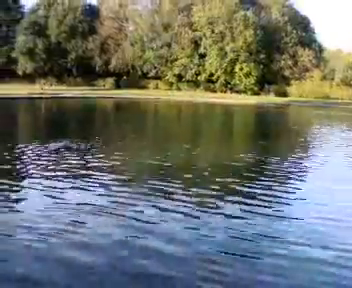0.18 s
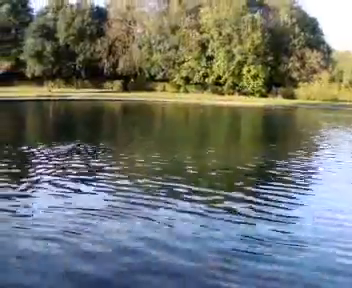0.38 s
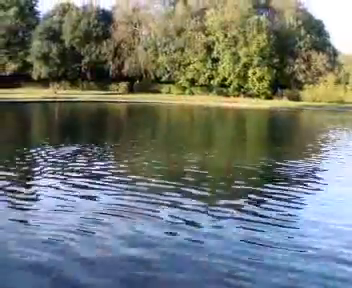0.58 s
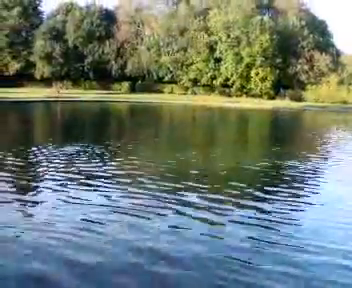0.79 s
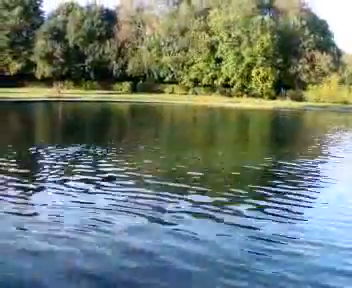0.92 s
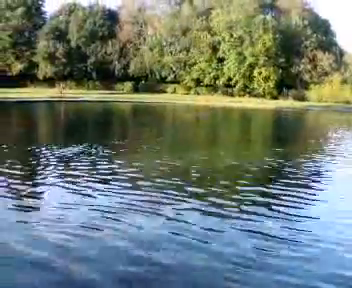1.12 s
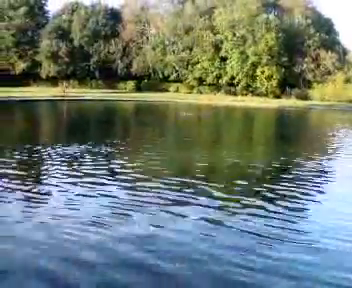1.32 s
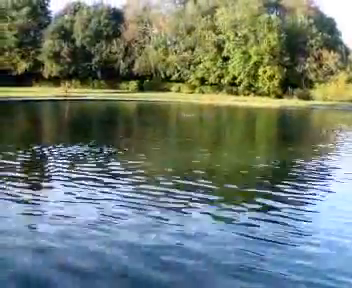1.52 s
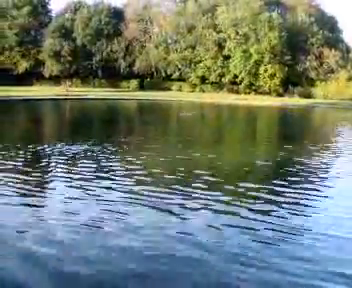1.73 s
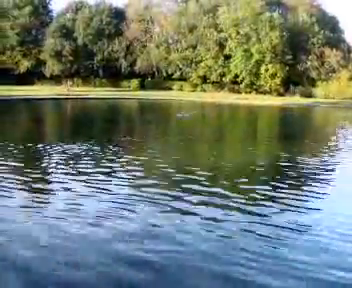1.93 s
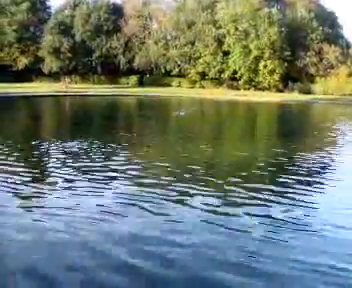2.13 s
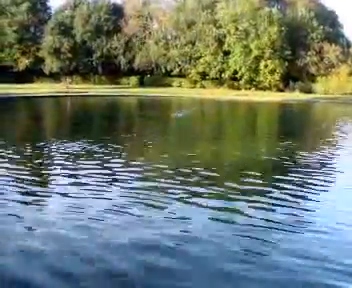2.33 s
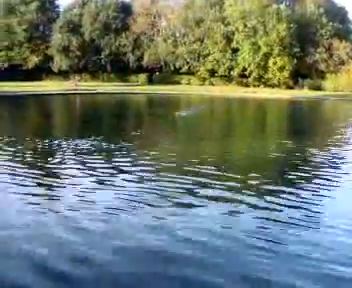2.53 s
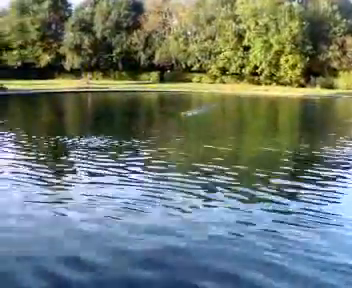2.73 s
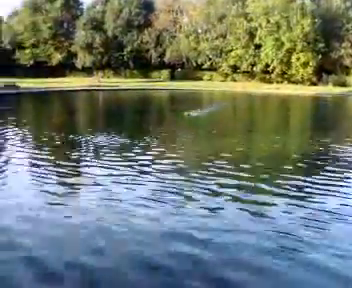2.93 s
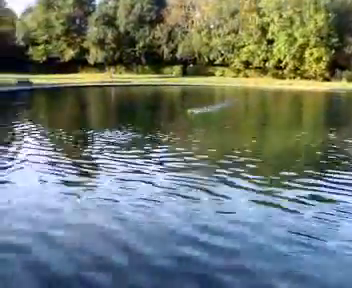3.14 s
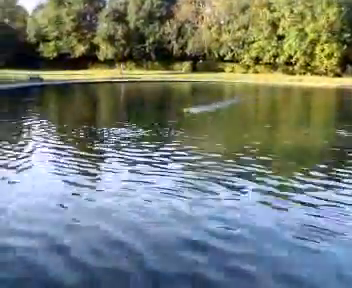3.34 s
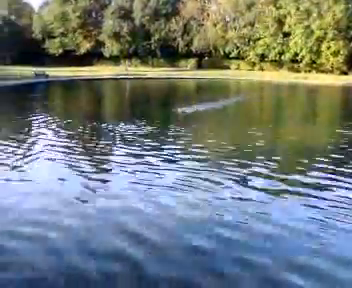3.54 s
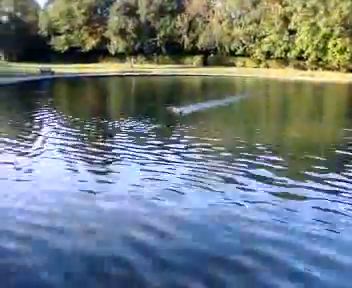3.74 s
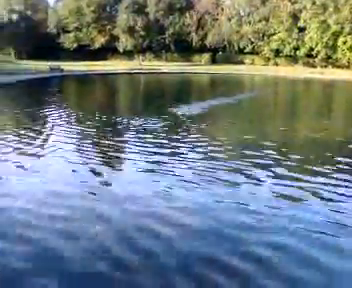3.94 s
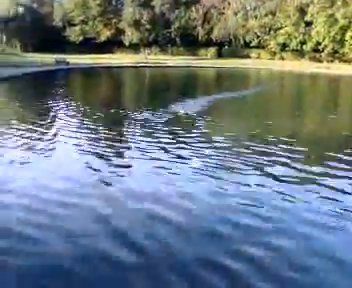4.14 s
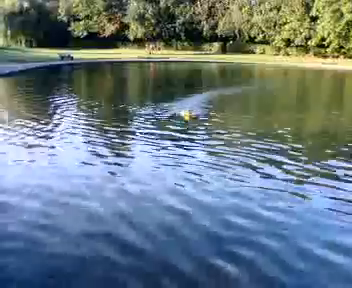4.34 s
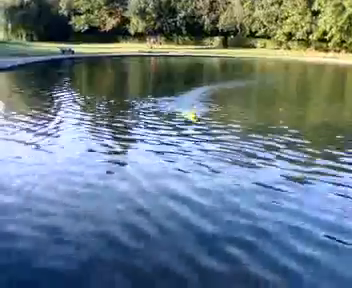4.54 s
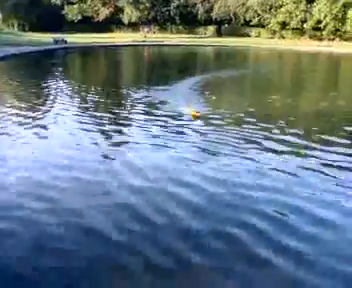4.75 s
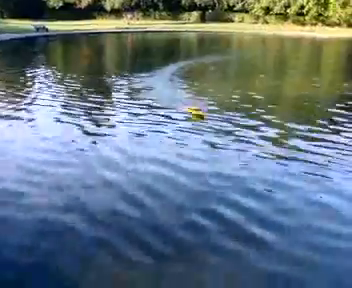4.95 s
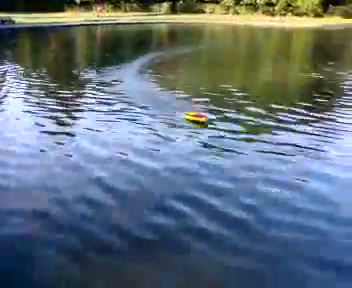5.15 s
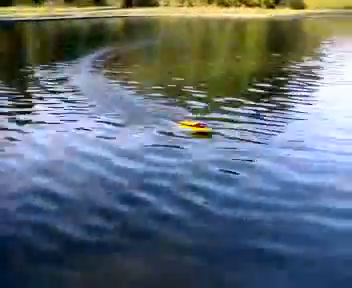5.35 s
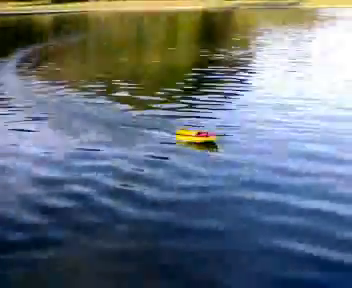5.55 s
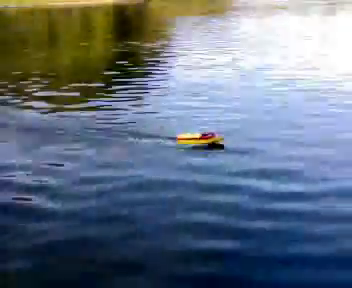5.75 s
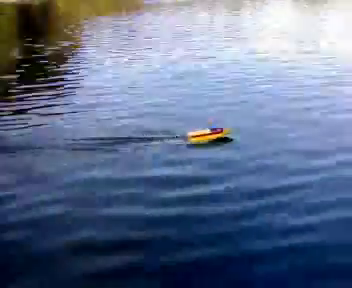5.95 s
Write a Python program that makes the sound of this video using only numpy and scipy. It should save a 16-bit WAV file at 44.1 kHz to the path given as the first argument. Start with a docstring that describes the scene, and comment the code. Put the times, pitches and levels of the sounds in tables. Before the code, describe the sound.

A small model boat engine buzzes in a steady nasal whine across a pond, rattling and hissing, growing much louder as it passes close.

```python
"""Model boat on a pond

A model boat with a small glow-plug two-stroke rounds a park pond and comes close to a listener on the bank.
One firing a turn gives a harmonic series, summed from sinusoids, whose balance changes with heading.
The fifth harmonic drums in gated bursts when the hull lifts off the ripples. Exhaust gas and spray hiss
between the harmonics as noise bands puffing once a turn, over the low noise of a distant town.
"""
import sys
import numpy as np
from scipy import signal
from scipy.io import wavfile
from scipy.ndimage import uniform_filter1d

SR = 44100
rng = np.random.default_rng(int(sys.argv[2]) if len(sys.argv) > 2 else 0)


def inscribe(sig):
    """Save sig as 16-bit PCM at rate SR to the path in sys.argv[1].

    A 1-D sig is mono; a 2-D sig holds one channel per row.
    Samples are clipped to [-1, 1] before scaling.
    """
    pcm = np.round(np.clip(np.atleast_2d(sig).T, -1, 1) * 32767)
    wavfile.write(sys.argv[1], SR, pcm.astype(np.int16))


N = 265460

# Engine speed. Each row: time in seconds, firing rate in Hz.
FIRING_RATE = [(0.0, 238.4), (0.3, 240.3), (0.45, 238.7), (0.7, 240.0), (1.3, 242.6), (1.5, 241.4),
               (1.62, 244.3), (1.85, 244.6), (2.05, 243.2), (2.25, 245.8), (2.8, 245.2), (3.0, 242.5),
               (3.2, 244.1), (3.5, 243.6), (3.65, 239.9), (3.77, 241.3), (3.93, 235.4), (4.1, 237.9),
               (4.4, 239.3), (4.9, 243.2), (5.25, 241.4), (5.72, 241.6), (5.82, 240.3), (6.02, 241.2)]
# The boat's way in. Each row: time in seconds, distance in metres.
DISTANCE = [(0, 34.6), (1, 31), (2, 27.5), (2.6, 22.1), (3.3, 19.7), (4, 13.7), (4.5, 10.9), (5, 6.8),
            (5.7, 4.66), (6.02, 5.54)]
# Side turned to the listener. Each row: time in seconds, heading as a place among the six views
# (0 far side, 1 far quarter, 2 bow quarter, 3 bow, 4 near side, 5 stern quarter; held beyond the ends).
HEADING_TRACK = [(0, -0.5), (.8, 0.2), (1.4, 0.9), (2.1, 0.9), (2.8, 2), (3.45, 2), (3.85, 3), (4.7, 3),
                 (5.4, 3.95), (5.66, 4.5), (5.87, 5), (6.02, 6)]
# Harmonic balance in the six views. Each row: multiple of the firing rate, relative level in dB.
FAR_SIDE_HARMONICS = [(1, -5.5), (2, 2.5), (3, -6.5), (4, -11), (5, 0.5), (6, -6), (7, -9.5), (8, -8),
                      (9, -17.5), (10, -20), (11, -17), (12, -12), (13, -34), (14, -17), (15, -18),
                      (16, -23), (17, -35), (18, -11.5), (19, -26), (20, -2), (21, -23), (22, -24),
                      (23, -27), (24, -45), (25, -34), (26, -47), (27, -49), (28, -37)]
FAR_QUARTER_HARMONICS = [(1, -9.5), (2, 1), (3, -7.5), (4, -10), (5, 0), (6, -10), (7, -14), (8, -18),
                         (9, -13.5), (10, -15), (11, -22), (12, -19), (13, -22.5), (14, -12), (15, -23.5),
                         (16, -16), (17, -11), (18, -19.5), (19, -21), (20, -13.5), (21, -26.5),
                         (22, -33.5), (23, -27), (24, -37.5), (25, -31.5), (26, -40), (27, -43.5),
                         (28, -45)]
BOW_QUARTER_HARMONICS = [(1, -9.5), (2, 0), (3, -6.5), (4, -9.5), (5, 0.5), (6, -18), (7, -13), (8, -28.5),
                         (9, -8), (10, -19.5), (11, -31), (12, -17.5), (13, -24.5), (14, -12), (15, -16),
                         (16, -24.5), (17, -13.5), (18, -21), (19, -10.5), (20, -14), (21, -27.5),
                         (22, -25), (23, -31), (24, -35), (25, -34.5), (26, -36.5), (27, -43), (28, -58)]
BOW_HARMONICS = [(1, -4.5), (2, 4.5), (3, -3), (4, -8), (5, -4.0), (6, -3), (7, -10.5), (8, -11.5),
                 (9, -12), (10, -15.5), (11, -15.5), (12, -32), (13, -17), (14, -23.5), (15, -13),
                 (16, -35), (17, -30), (18, -14), (19, -23.5), (20, -19), (21, -29.5), (22, -23),
                 (23, -35.5), (24, -32), (25, -44), (26, -46.5), (27, -46), (28, -44.5)]
NEAR_SIDE_HARMONICS = [(1, -8.5), (2, 1.5), (3, -11), (4, -10.5), (5, 1), (6, -13), (7, -17.5), (8, -19),
                       (9, -21.5), (10, -20.5), (11, -21), (12, -32), (13, -25.5), (14, -37.5), (15, -26),
                       (16, -26), (17, -20.5), (18, -6.5), (19, -7), (20, -3.5), (21, -23), (22, -20),
                       (23, -23.5), (24, -29), (25, -30), (26, -46.5), (27, -40.5), (28, -40)]
STERN_QUARTER_HARMONICS = [(1, -11), (2, -5.5), (3, -9.5), (4, -17), (5, 1), (6, -19.5), (7, -12),
                           (8, -25.5), (9, -20.5), (10, -21.5), (11, -27), (12, -40), (13, -22.5),
                           (14, -31.5), (15, -17.5), (16, -28), (17, -21), (18, -13), (19, -17), (20, -17),
                           (21, -24), (22, -28), (23, -31.5), (24, -37), (25, -33.5), (26, -47.5),
                           (27, -45), (28, -38.5)]
# Hull drumming on the 5th harmonic, as heard by the listener.
# Each row: start in seconds, length in seconds, level in dB.
DRUM_BURSTS = [(0.008, 0.09, -34.5), (0.162, 0.058, -33.5), (0.284, 0.087, -33), (0.411, 0.025, -38),
               (0.5, 0.022, -32), (0.618, 0.058, -31), (0.812, 0.06, -31), (0.96, 0.05, -29.5),
               (1.047, 0.036, -35), (1.105, 0.045, -35), (1.194, 0.021, -32.5), (1.29, 0.016, -31),
               (1.363, 0.041, -31.5), (1.49, 0.035, -31), (1.592, 0.036, -36), (1.76, 0.025, -31.5),
               (1.892, 0.038, -33.5), (1.956, 0.027, -27.5), (2.088, 0.064, -27.5), (2.251, 0.091, -26.5),
               (2.532, 0.071, -26), (2.669, 0.014, -32), (2.731, 0.096, -27.5), (2.944, 0.024, -27),
               (3.038, 0.079, -26.4), (3.271, 0.076, -24), (3.436, 0.016, -29), (3.491, 0.057, -27.5),
               (3.71, 0.04, -26), (3.829, 0.023, -29), (3.89, 0.04, -30), (3.974, 0.02, -32),
               (4.18, 0.061, -30.5), (4.353, 0.055, -24), (4.434, 0.017, -28.5), (4.502, 0.0074, -20.5),
               (4.538, 0.07, -24.5), (4.645, 0.042, -26.5), (4.753, 0.034, -24.5), (4.864, 0.018, -24.5),
               (4.909, 0.027, -23), (5.14, 0.06, -22), (5.21, 0.065, -17), (5.3, 0.05, -20),
               (5.372, 0.03, -18.5), (5.512, 0.07, -15.5), (5.602, 0.021, -16), (5.645, 0.05, -17.5),
               (5.739, 0.098, -11.5), (5.933, 0.11, -12)]
# Spectrum of gas and spray. Each row: frequency in Hz, far and near relative density in dB per Hz.
SPRAY_SPECTRUM = [(200, -21.5, -17), (320, -7, -18.5), (577, -2.5, -5), (950, 3, -4.5), (1600, 0.5, -6),
                  (1980, -4.5, -8), (2400, 0.5, -8.5), (2820, -9.5, -10.5), (3370, -2.5, -4.5),
                  (4600, -5.5, -6), (5040, -12.5, -11), (6170, -25, -21.5), (7240, -37, -29)]
# Clearest splashes off the bow. Each row: time in seconds, peak rise over the spray in dB, centre in Hz.
BOW_SPLASHES = [(1.36, 9, 1600), (1.68, 6, 1500), (2.21, 20, 1500), (2.56, 6, 1100), (2.9, 6, 1700),
                (5.31, 11, 1300), (5.67, 15.5, 2400), (5.75, 8.5, 900), (5.94, 21, 1100)]
# Spectrum of the town. Each row: frequency in Hz, relative density in dB per Hz.
TOWN_SPECTRUM = [(12, -35), (20, -5), (22, -10.5), (63, 0), (144, -11), (178, -18.5), (215, -0.5),
                 (280, -36.5), (470, -120)]

ENGINE_DB, SPRAY_DB = -4.5, -4.5  # base levels of the 2nd harmonic and the spray spectrum, at 1 m
FAR_M, NEAR_M = 28, 5  # the spray passes from far to near colour between these distances
HUNT_HZ, TURN_HZ = 0.55, 0.45  # rms wander of the firing rate: hunting, and unevenness between turns
LIFT_HZ = 0.5  # rise in firing rate as the hull lifts
REST_DB = -5  # 5th harmonic left between bursts, relative to its ordinary level
SLAM_S, SLAM_DB = 0.021, -1.5  # delay and depth of the fundamental's dip after each lift
TOWN_DB = -48.5  # rms level
TOP_HZ = 7360  # upper limit of the recorder


def engine(phase, level_db, drum, lifted):
    """Harmonic synthesis: partials locked to the shaft, each with its own directivity and random modulation."""
    heading = curve(HEADING_TRACK)[0]
    views = np.array([FAR_SIDE_HARMONICS, FAR_QUARTER_HARMONICS, BOW_QUARTER_HARMONICS,
                      BOW_HARMONICS, NEAR_SIDE_HARMONICS, STERN_QUARTER_HARMONICS])[:, :, 1]
    views = views - views[:, 1:2]  # relative to the 2nd harmonic of each view
    # lifting the hull frees the 3rd harmonic and those near 3.5 kHz, and dulls the 6th
    lift_db = {2: 0.8, 3: 4.5, 6: -5.5, 9: 2.5, 14: 6.0, 15: 4.0, 17: 1.5}
    # the hull panels shake more than the exhaust note and the intake whine
    low_roughness = {1: 0.11, 2: 0.08, 3: 0.24, 4: 0.75, 6: 0.2}
    out = 0
    for k in range(1, views.shape[1] + 1):
        view_db = np.interp(heading, np.arange(len(views)), views[:, k - 1])
        db = level_db + view_db + lift_db.get(k, 0) * (lifted - 0.4)
        if k == 1:
            db = db + SLAM_DB * (np.roll(lifted, int(SLAM_S * SR)) - 0.4)
        rough = low_roughness.get(k, 0.45 if k < 17 else 0.14 if k < 21 else 0.35)
        if k == 5:
            bursts = drum * waver(0.03, 0.19, 0.1)
            rest = (1 - lifted) * undb(db + REST_DB) * waver(0.11, 0.5, 0.56)
            gain = bursts + rest
        else:
            gain = undb(db) * waver(0.41 * rough, 1.26 * rough, 1.05 * rough * min(k / 6, 1))
        start = np.exp(1j * 1.22 * rng.standard_normal())  # random starting phase
        out = out + np.sqrt(2) * np.real(gain * start * np.exp(1j * k * phase))
    return out


def drumming():
    """Gated excitation: soft-edged burst gain, and a 0-1 gate open while the hull is lifted."""
    gain = np.zeros(N)
    for start, length, db in DRUM_BURSTS:
        gain[max(int(start * SR), 0):int((start + length) * SR)] = undb(db)
    edge = int(0.014 * SR)
    gate = 1.0 * (gain > 0)
    return uniform_filter1d(gain, size=edge), uniform_filter1d(gate, size=edge)


def spray(phase, lifted, level_db, near):
    """Turbulence noise: narrow bands puff once a turn and gurgle in clumps; lift frees hiss near 3.6 kHz."""
    t = np.arange(N) / SR
    puff = 1 + 0.45 * np.cos(phase)
    slap = np.clip(walk(30) - 0.8, 0, 1.2)  # only the upper swings of the walk
    out = 0
    for hz in 220 * 2 ** np.arange(0, 5.1, 1 / 5):
        far_db, near_db = colour(SPRAY_SPECTRUM, hz)
        wet = np.exp(-(np.log2(hz / 1500) / 0.61) ** 2)  # water is strongest in the middle range
        freed = np.exp(-(np.log2(hz / 3600) / 0.64) ** 2)
        db = far_db + near * (near_db - far_db)
        db = db + 2.4 * wet * slap + (2.87 + 1.9 * wet) * walk(28)
        db = db + 1.7 * freed * lifted * (1 - near)
        for time, splash_db, splash_hz in BOW_SPLASHES:
            in_band = np.exp(-(np.log2(hz / splash_hz) / 0.23) ** 2)
            arch = np.clip(1 - ((t - time) / 0.03) ** 2, 0, 1)
            db = db + splash_db * in_band * arch
        out = out + undb(db) * band(hz * 2 ** (-1 / 10), hz * 2 ** (1 / 10))
    return undb(level_db) * puff * out


def town():
    """Superposed noise bands: distant traffic and air, each low band swelling a little on its own."""
    swell_db = 1.2
    out = 0
    for hz in 24 * 2 ** np.arange(0, 3.6, 0.5):
        db = colour(TOWN_SPECTRUM, hz)[0] + swell_db * walk(3.0)
        out = out + undb(db) * band(hz / 2 ** 0.19, hz * 2 ** 0.25)
    return out * undb(TOWN_DB) / out.std()


def waver(slow, quick, skirt):
    """Random modulation: complex gain of nominal rms 1, a steady part plus slow, quick and noisy sidebands."""
    def pair(rate):
        """Quadrature modulation: two independent walks sway amplitude and phase."""
        return walk(rate) + 1j * walk(rate)

    total = 1 + slow * pair(9) + quick * pair(55) + skirt * pair(170)
    return total / np.sqrt(1 + 2 * (slow ** 2 + quick ** 2 + skirt ** 2))


def walk(rate):
    """Smoothed random process: levels held 1 / rate s, averaged twice and scaled to unit spread."""
    hold = int(SR / rate)
    steps = np.repeat(rng.standard_normal(N // hold + 1), hold)
    smooth = uniform_filter1d(uniform_filter1d(steps, hold), hold)[:N]
    return smooth / smooth.std()


def band(lo_hz, hi_hz):
    """Band-pass filtering: white noise kept between two frequencies, with soft edges."""
    sos = signal.butter(2, [lo_hz, hi_hz], "bandpass", fs=SR, output="sos")
    return signal.sosfilt(sos, rng.standard_normal(N))


def colour(table, hz):
    """Spectral interpolation: dB of each column at one frequency, linear in log frequency."""
    f, *columns = np.transpose(table)
    return [np.interp(np.log(hz), np.log(f), db) for db in columns]


def curve(table):
    """Linear interpolation in time: each column becomes a signal."""
    times, *columns = np.transpose(table)
    return [np.interp(np.arange(N) / SR, times, column) for column in columns]


def undb(db):
    """Logarithmic level: decibels to amplitude gain."""
    return 10 ** (np.asarray(db) / 20)


def scene():
    """Spherical spreading: steady harmonics and spray fall 6 dB per doubling of distance; drum bursts and
    town have their own levels."""
    metres = curve(DISTANCE)[0]
    spread_db = -20 * np.log10(metres)
    near = np.clip(np.log(FAR_M / metres) / np.log(FAR_M / NEAR_M), 0, 1)
    drum, lifted = drumming()
    hz = curve(FIRING_RATE)[0] + HUNT_HZ * walk(12) + LIFT_HZ * (lifted - lifted.mean())
    phase = 2 * np.pi * np.cumsum(hz + TURN_HZ * walk(30)) / SR
    boat = engine(phase, ENGINE_DB + spread_db, drum, lifted)
    water = spray(phase, lifted, SPRAY_DB + spread_db, near)
    return (boat + water + town())[None]


def record(dry):
    """Saturation and band limiting: the loudest peaks are rounded, then the top is cut steeply."""
    rounded = np.tanh(0.7 * dry) / 0.7
    sos = signal.ellip(12, 0.2, 80, TOP_HZ, fs=SR, output="sos")
    return signal.sosfilt(sos, rounded)


dry = scene()
out = record(dry)
inscribe(out)
```